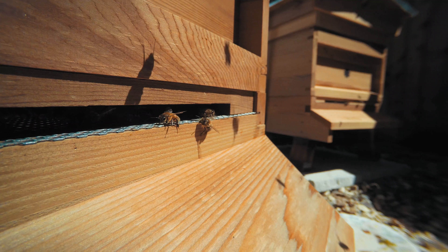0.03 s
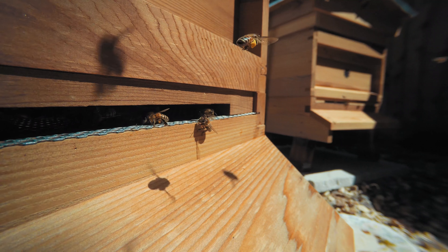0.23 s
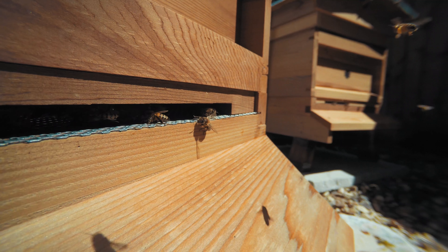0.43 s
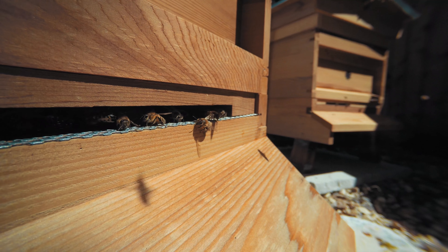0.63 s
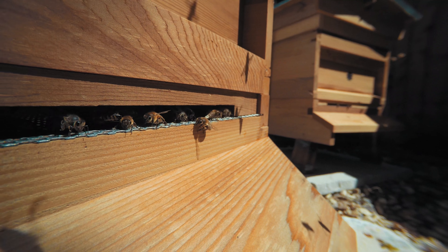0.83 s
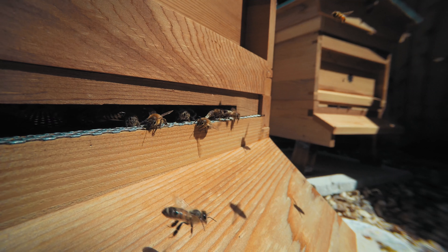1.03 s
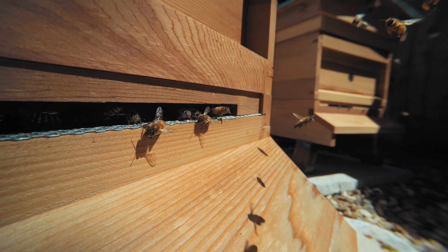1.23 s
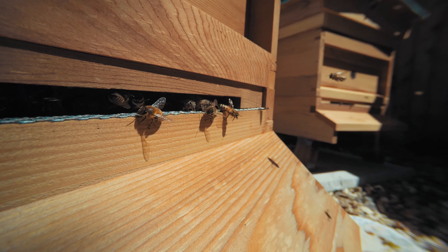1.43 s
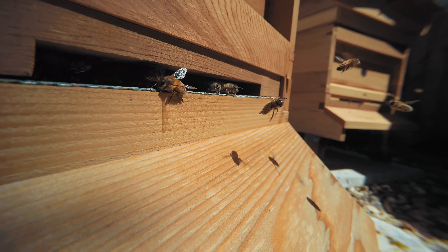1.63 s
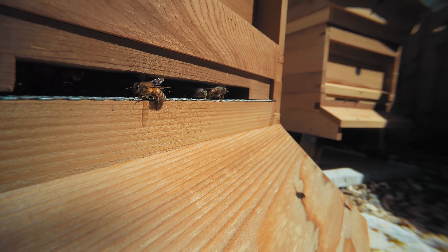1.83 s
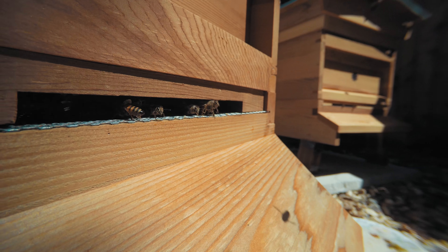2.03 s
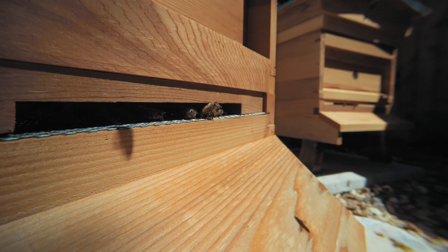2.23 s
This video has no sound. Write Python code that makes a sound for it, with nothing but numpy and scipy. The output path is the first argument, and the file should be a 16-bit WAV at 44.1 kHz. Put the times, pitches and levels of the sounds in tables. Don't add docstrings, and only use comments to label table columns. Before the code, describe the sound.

A low, raspy honeybee buzz fades in outdoors, with faint airy wing rustles early, then nearby bees hovering in turn, slightly unsteady in pitch, above a soft distant swarm hum, captured close and dry.

```python
import sys
import numpy as np
from scipy import signal
from scipy.fft import rfft, irfft, next_fast_len
from scipy.io import wavfile
from scipy.ndimage import uniform_filter1d

SR = 44100
rng = np.random.default_rng(int(sys.argv[2]) if len(sys.argv) > 2 else 0)


def dump_mix(stems):
    frames = np.atleast_2d(stems).T
    limited = np.clip(frames, -1, 1)
    pcm = np.round(limited * 32767).astype(np.int16)
    wavfile.write(sys.argv[1], SR, pcm)


def gain_from_decibels(decibels):
    exponent = np.asarray(decibels, float) / 20
    return 10 ** exponent


N = 101429
T = np.arange(N) / SR
FADE_START_S, FADE_END_S, FADE_POWER = 0.076, 1.03, 1.04
SWARM_HZ = 248.6
RUSTLE_STEADY = 0.24
# (multiple of wingbeat [1], level [dB])
WING_MULTIPLES = [(1, -5.5), (2, 2), (3, 0), (4, -15), (5, -12.5), (6, -15), (7, -14.5), (8, -17),
                  (9, -20.5), (10, -28), (11, -21.5), (12, -28.5), (13, -35.5), (14, -33.5), (15, -31),
                  (16, -31.5), (17, -34.5), (18, -42)]


def rms_one(x):
    return x / np.sqrt(np.mean(x ** 2) + 1e-20)


def drift(rate):
    hop = 40
    pole = np.exp(-2 * np.pi * hop * rate / SR)
    noise = rng.standard_normal(N // hop + 2002)
    slow = signal.lfilter([1], [1, -2 * pole, pole * pole], noise)[2000:]
    return np.interp(np.arange(N) / hop, np.arange(len(slow)), rms_one(slow - slow.mean()))


def coloured(x, points):
    hz, db = np.transpose(points)
    size = next_fast_len(N)
    bins = np.maximum(np.arange(size // 2 + 1) * SR / size, 1)
    gain = gain_from_decibels(np.interp(np.log(bins), np.log(hz), db, left=-70))
    return rms_one(irfft(rfft(x, size) * gain, size)[:N])


def fade_in():
    return np.clip((T - FADE_START_S) / (FADE_END_S - FADE_START_S), 0, 1) ** FADE_POWER


def outdoor_floor():
    # (frequency [Hz], density [dB per Hz])
    floor_colour = [(20, -8), (43, -16.5), (125, -10.5), (200, -8), (400, -5.5), (1000, -6.5), (4500, -23),
                    (9000, -31.5)]
    return gain_from_decibels(-47) * coloured(rng.standard_normal(N), floor_colour)


def far_bees():
    count, spread, wander = 18, 0.13, 0.035
    level_db, swell_db, tilt_db = -63, 4.0, -4.5
    hum = 0
    for place in np.linspace(-1, 1, count):
        hz = SWARM_HZ * (1 + spread * place + wander * drift(8.08))
        phase = 2 * np.pi * np.cumsum(hz) / SR
        stack = 0
        for k, db in WING_MULTIPLES[:9]:
            stack = stack + gain_from_decibels(db + tilt_db * np.log2(k)) * np.cos(k * phase + k * k)
        hum = hum + gain_from_decibels(level_db + swell_db * drift(2.9)) * stack
    return hum


def passing_bees():
    # (time [s], half length [s], level [dB], low edge [Hz], high edge [Hz])
    crossings = [
        (0.283, 0.046, -60.5, 5500, 8400),
        (0.593, 0.16, -59, 4600, 7200),
        (.72, 0.13, -62, 9400, 11600),
    ]
    out = 0
    for s, half_s, db, low_hz, high_hz in crossings:
        pulse = RUSTLE_STEADY + np.cos(2 * np.pi * SWARM_HZ * T) ** 4
        puffs = pulse * rng.standard_normal(N)
        band_pass = signal.butter(2, [low_hz, high_hz], "band", fs=SR, output="sos")
        swell = np.exp(-0.5 * ((T - s) / half_s) ** 2)
        out = out + gain_from_decibels(db) * rms_one(signal.sosfilt(band_pass, puffs)) * swell
    return out


def companion():
    wingbeat_hz, wander, tilt_db = 254, 0.03, 5.0
    below_db, swell_db = -24, 3.5
    phase = 2 * np.pi * np.cumsum(wingbeat_hz * (1 + wander * drift(8.0))) / SR
    stack = 0
    for k, db in WING_MULTIPLES:
        stack = stack + gain_from_decibels(db + tilt_db * np.log2(k)) * np.cos(k * phase + k * k)
    return gain_from_decibels(below_db + swell_db * drift(6.2)) * stack


def rustle(phase):
    # (frequency [Hz], density [dB per Hz])
    rustle_colour = [(300, -21.5), (700, 2), (1500, -9), (3300, -11.5), (5200, -25), (6800, -25.5),
                     (10600, -20), (15800, -12)]
    spread_db, upstroke_db, swell_db, sharpness = 2.5, -5, 2.0, 4.0
    stroke = np.floor(phase / np.pi + 0.5).astype(int)
    uneven = np.clip(rng.standard_normal(N // 20), -2, 2)[stroke]
    strength_db = spread_db * uneven + upstroke_db * (stroke % 2) + swell_db * drift(18)
    pulse = RUSTLE_STEADY + np.abs(np.cos(phase)) ** sharpness
    return coloured(gain_from_decibels(strength_db) * pulse * rng.standard_normal(N), rustle_colour)


def wing_tone(hz, phase, first_db, third_db, upper_db):
    # (centre [Hz], width [Hz], depth [dB])
    board_notch = (800.4, 26.7, -7.5)
    usual_first_db, usual_third_db = -9, -5
    waver_db, waver_growth_db, waver_per_s = 0.4, 0.6, 18.0
    stroke_lag_rad, twist_rad, twist_per_s = 0.04, 0.075, 35.0
    notch_hz, width_hz, depth_db = board_notch
    tone = 0
    for k, db in WING_MULTIPLES:
        notch_db = depth_db * np.exp(-0.5 * ((k * hz - notch_hz) / width_hz) ** 2)
        sway_db = (waver_db + waver_growth_db * np.log2(k)) * drift(waver_per_s)
        facing_db = 0
        if k == 1:
            facing_db = first_db - usual_first_db
        elif k == 3:
            facing_db = third_db - usual_third_db
        if k > 3:
            facing_db = upper_db
        turn = stroke_lag_rad * k * k + np.pi * (k == 1) + twist_rad * k * drift(twist_per_s)
        tone = tone + gain_from_decibels(db + notch_db + sway_db + facing_db) * np.cos(k * phase + turn)
    usual_power = np.sum(gain_from_decibels(np.transpose(WING_MULTIPLES)[1]) ** 2) / 2
    return tone / np.sqrt(usual_power)


def nearest_wingbeat():
    # (time [s], wingbeat [Hz])
    visits = [
        [(0.08, 265.2), (0.18, 250.5), (0.188, 257.2), (0.24, 270.2), (0.318, 240.2), (0.412, 267.2),
         (0.424, 252.8), (0.452, 263.6), (0.5, 255.4)],
        [(0.5, 254), (0.574, 267.2), (0.6, 253.8), (0.664, 263.8), (0.736, 239.6), (0.764, 262.2),
         (0.834, 235.2), (0.866, 235.4), (0.88, 253.7)],
        [(0.88, 258.3), (0.906, 261.9), (1.018, 240.1), (1.03, 249.2), (1.15, 259), (1.192, 257), (1.21, 240.3),
         (1.242, 259.6), (1.26, 251.7)],
        [(1.26, 247.7), (1.292, 239.2), (1.308, 254.7), (1.328, 243.9), (1.368, 262.3), (1.428, 242),
         (1.462, 264.6), (1.518, 239.1), (1.6, 257.1)],
        [(1.6, 251.3), (1.672, 254.3), (1.688, 244.7), (1.752, 256.1), (1.796, 239.7), (1.862, 260),
         (1.87, 250.4), (1.956, 251.9), (1.98, 256.5)],
        [(1.98, 260.3), (2.006, 258.6), (2.038, 241.6), (2.05, 253.6), (2.176, 240.5), (2.188, 253.5),
         (2.242, 233.7), (2.27, 249.8), (2.3, 240.9)],
    ]
    s, hz = np.transpose([row for visit in visits for row in visit])
    handover_s = 0.004
    rate = np.interp(T, np.maximum.accumulate(s), hz)
    return uniform_filter1d(rate, max(int(handover_s * SR), 1))


def wing_flicks():
    # (time [s], lift [dB])
    flicks = [
        (.77, 5),
        (.97, 2.5),
        (1.14, 1.5),
        (1.75, 3),
        (1.96, 2),
        (2.119, 4),
        (2.16, 1.5),
    ]
    flick_s = 0.01
    return sum(lift_db * np.exp(-0.5 * ((T - s) / flick_s) ** 2) for s, lift_db in flicks)


def nearest_bee():
    # (time [s], level [dB], first multiple [dB],
    # third multiple [dB], rustle [dB])
    nearness = [(0.08, -95, -13, -6, 0), (0.1, -80, -11, -6, 8), (0.22, -61, -4, -2, 7),
                (0.6, -47, -2.5, -26, 7), (0.66, -39.5, -6.5, -29, 1), (0.83, -37.5, -12, -8, 2),
                (0.86, -37.5, -6, -2, 1), (0.91, -36.5, -23, -21, 7.5), (0.96, -33.5, -8, -5.5, -0.5),
                (1.04, -37.5, -12, -7.5, -2), (1.07, -32, -11.5, -7.5, -1.5), (1.62, -33, -10.5, -5, 2),
                (2.0, -31, -9, -2, 2.5), (2.04, -34, -5.5, 1, 1.5), (2.06, -24.5, -13, -3.5, -1),
                (2.08, -40, -2, -8, 6.5), (2.1, -33, -6, -1.5, 3.5), (2.3, -29.5, -2, -5, -3)]
    beat_jitter, upper_follow = 0.009, 0.29
    when, *controls = np.transpose(nearness)
    db, first_db, third_db, rustle_db = [np.interp(T, when, control) for control in controls]
    rustle_db = rustle_db + wing_flicks()
    hz = nearest_wingbeat()
    phase = 2 * np.pi * np.cumsum(hz * (1 + beat_jitter * drift(44))) / SR
    tone = wing_tone(hz, phase, first_db, third_db, upper_follow * rustle_db)
    air = gain_from_decibels(-16 + rustle_db) * rustle(phase - 1.0)
    return gain_from_decibels(db) * (tone + companion() + air) * (T > FADE_START_S)


def scene():
    background = outdoor_floor() + far_bees() + passing_bees()
    return (nearest_bee() + fade_in() * background)[None]


def top_cut(x):
    return signal.sosfilt(signal.butter(12, 16740, fs=SR, output="sos"), x)


def record(dry):
    # (centre [Hz], width [Hz], gain [dB])
    port = [(4010, 360, 6.5), (8170, 630, 9), (13020, 690, 7.5), (10800, 310, -3)]
    rumble_cut_hz, top_hz = 30, 15760
    size = next_fast_len(N + 2048)
    hz = np.arange(size // 2 + 1) * SR / size
    port_db = sum(db * np.exp(-0.5 * ((hz - centre_hz) / width_hz) ** 2) for centre_hz, width_hz, db in port)
    response = gain_from_decibels(port_db) * (hz < top_hz) * hz / np.hypot(hz, rumble_cut_hz)
    heard = irfft(rfft(dry, size) * response, size)[:, :N]
    return top_cut(heard * (T > FADE_START_S))


dry = scene()
out = record(dry)
dump_mix(out)
```